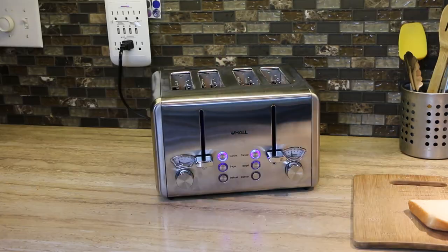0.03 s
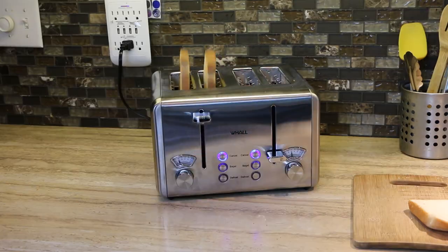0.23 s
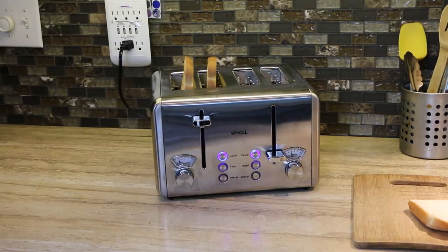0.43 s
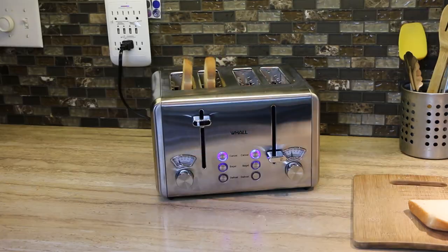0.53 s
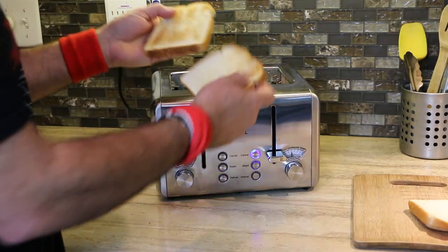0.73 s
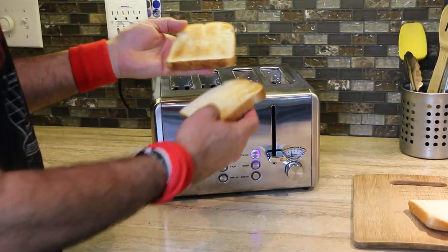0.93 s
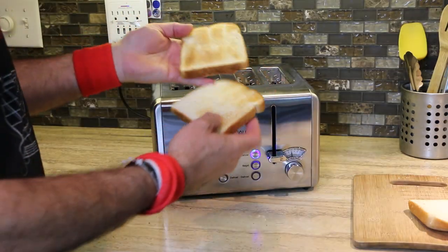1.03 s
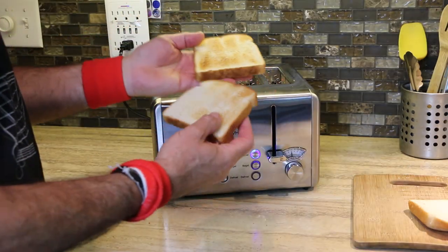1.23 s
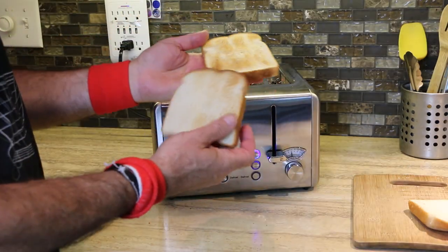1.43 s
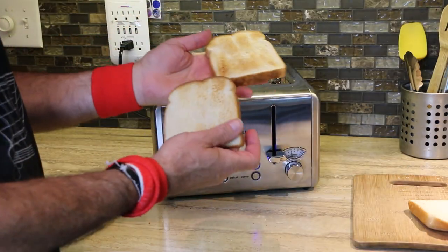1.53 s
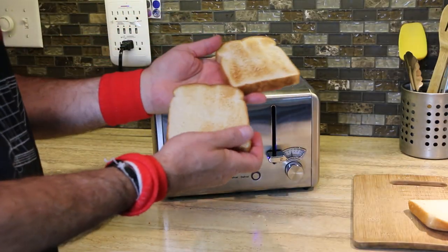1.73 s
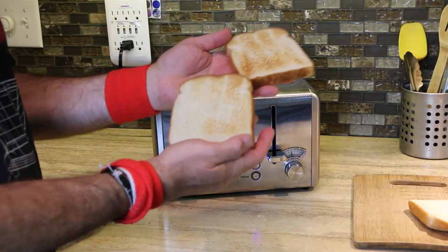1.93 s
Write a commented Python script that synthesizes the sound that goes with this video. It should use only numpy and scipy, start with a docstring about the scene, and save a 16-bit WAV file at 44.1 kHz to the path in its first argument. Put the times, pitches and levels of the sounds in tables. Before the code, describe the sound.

A toaster pops up at about 0.15 seconds with a sharp metal clack, a bright rattle and a soft thump on the counter. Lighter knocks and wire clinks follow until about 0.7 seconds as the toast and racks settle. The metal case and springs ring briefly, dying away with the kitchen's echo by around one second and leaving only faint, fan-like room noise.

```python
"""A sharp metal clack and rattle, then a few lighter knocks: a steel toaster pops up on a kitchen counter.
The latch lets go, the sprung carriage slams into its stop and rebounds, toast and wire racks settle.
The blows ring the sheet-metal case and springs; the recoil thumps the worktop.
A hard-walled kitchen reverberates over faint fan-like room noise."""
import sys
import numpy as np
from scipy import signal
from scipy.fft import rfft, irfft
from scipy.io import wavfile

SR = 44100
rng = np.random.default_rng(int(sys.argv[2]) if len(sys.argv) > 2 else 0)


def materialize(psi):
    """Save the field psi as 16-bit PCM at rate SR to the path in sys.argv[1].

    A 1-D psi becomes a single channel; in a 2-D psi each row is a channel.
    """
    bounded = np.clip(np.atleast_2d(psi).T, -1, 1)
    quanta = np.round(bounded * 32767).astype(np.int16)
    wavfile.write(sys.argv[1], SR, quanta)


N = 88200
T = np.arange(N) / SR
FREQS = np.maximum(np.arange(N + 1) * SR / (2 * N), 1)
ATTACK_S = 0.001

# latch, slam, rebounds, settling: t/s, clack level/dB, rattle level/dB, rattle cutoff/Hz, rise/s, t60/s
CARRIAGE_BLOWS = [(0.1319, -28.5, -39.5, 15000, 0.00081, 0.24), (.146, -13, -35, 11000, 0.0048, 0.076),
                  (0.1514, -12, -36, 12000, 0.0017, .06), (.159, -19.5, -32, 13000, 0.002, 0.067),
                  (0.175, -22.5, -25, 15200, 0.0021, 0.092), (0.183, -30.5, -24.5, 14800, 0.0038, 0.19),
                  (.200, -46, -31.5, 14600, 0.0064, 0.29), (0.244, -41, -45, 11000, 0.0015, 0.24),
                  (.300, -35, -60, 8000, 0.0026, 0.1), (.343, -35.5, -52, 8000, 0.0043, 0.26),
                  (0.364, -36.5, -35.5, 15000, 0.0046, 0.17), (0.382, -36.5, -34.5, 13800, 0.0036, 0.12),
                  (0.426, -38.5, -56, 7000, 0.0034, 0.15), (0.496, -41, -39, 9600, .003, 0.12),
                  (.575, -35, -36, 9400, 0.0041, .085), (.607, -41, -50, 8000, 0.0016, 0.03),
                  (0.659, -54, -69, 6980, 0.0046, 0.11)]


def carriage():
    """Each blow is a burst of contacts: frame clack plus brighter rattle, duller when soft toast lands."""
    # frame spectrum: f/Hz, level/dB
    clack_spectrum = [(59, -49), (100, -8), (403, -5), (742, -6.5), (1090, -8), (1370, -8), (2370, -8.5),
                      (2630, -12), (3390, -9), (4190, -13.5), (4750, -12.5), (5170, -22), (7560, -22),
                      (12600, -30), (15500, -38)]
    # rattle spectrum: f/Hz, level/dB
    rattle_spectrum = [(500, -14), (2000, -5.5), (4300, -0.5), (5500, -2), (7600, -2.5), (10000, -6),
                       (12300, -5), (15500, -8)]
    clack, rattle = 0, 0
    for start_s, clack_db, rattle_db, cutoff_hz, rise_s, t60_s in CARRIAGE_BLOWS:
        burst = fade(start_s, t60_s, rise_s)
        lowpass = signal.butter(2, cutoff_hz, fs=SR, output="sos")
        clack += undb(clack_db) * burst * chatter()
        rattle += undb(rattle_db) * signal.sosfilt(lowpass, burst * chatter())
    return colour(clack, clack_spectrum) + racks(colour(rattle, rattle_spectrum))


def racks(rattle):
    """The wire racks add narrow treble resonances."""
    # rack resonances: f/Hz, width/Hz, level/dB
    resonances = [(3400, 220, -21), (5050, 90, -9), (7450, 150, -13), (7950, 220, -11), (10960, 180, -3),
                  (12700, 200, -1)]
    peaks = sum(undb(db) / (1 + 2j * (FREQS - hz) / width_hz) for hz, width_hz, db in resonances)
    return shape(rattle, 1 + peaks)


def case(force_scatter=0.28):
    """The blows ring panels and springs, each mode with a slightly different force every time."""
    # case and spring modes: f/Hz, rms level/dB, t60/s
    modes = [(104.9, -55, 1.1), (209.8, -46, 0.98), (417, -52, .95), (615, -56, 1.27), (773, -52, 0.2),
             (860, -51.5, 0.34), (1130, -51.5, 0.22), (1145, -53, 0.26), (1260, -60, 0.47),
             (1748, -57.5, 0.51), (2000, -58.5, 1.1), (3330, -52, 0.11), (3335, -49, .42),
             (3435, -54, 0.11)]
    onsets = [int(blow[0] * SR) for blow in CARRIAGE_BLOWS]
    strength = undb([blow[1] for blow in CARRIAGE_BLOWS])
    force = strength[:, None] * (1 + force_scatter * rng.standard_normal((len(onsets), len(modes))))
    ringing = 0
    for k, (hz, db, t60_s) in enumerate(modes):
        impulses = np.zeros(N)
        impulses[onsets] = force[:, k]
        mode = signal.fftconvolve(impulses, ring(0, hz, t60_s, ATTACK_S))[:N]
        ringing += undb(db) * unit(mode)
    return ringing


def counter(rise_s=0.0087):
    """Recoil rocks the toaster on its feet and thumps the worktop."""
    # thumps: t/s, level/dB
    thumps = [(.139, -26), (.174, -30.5), (0.263, -32.5), (0.397, -35), (0.573, -39.5)]
    # modes of each thump: f/Hz, relative level/dB, t60/s
    modes = [(66.3, -12.5, 0.44), (94.2, 0.5, 0.2), (182.3, 1.5, 0.13), (221.5, 0, 0.19)]
    return sum(undb(thump_db + mode_db) * ring(start_s, hz, t60_s, rise_s)
               for start_s, thump_db in thumps for hz, mode_db, t60_s in modes)


def loose_wires(half_width_hz=160):
    """A loose rack wire buzzes briefly at its own resonance."""
    # wire clinks: t/s, f/Hz, level/dB, t60/s
    clinks = [(.175, 3320, -23.5, .025), (.257, 3380, -30, 0.032), (.286, 3350, -28, 0.023),
              (.42, 2540, -42, 0.095), (0.5576, 1970, -30, .04)]
    sound = 0
    for start_s, hz, db, t60_s in clinks:
        buzz = narrow_band(chatter(), hz, half_width_hz)
        sound += undb(db) * fade(start_s, t60_s, ATTACK_S) * buzz
    return sound


def kitchen(direct, gain_db=-5, build_s=0.0035):
    """Diffuse wall reflections build up and die away, treble first."""
    # reverb spectrum: f/Hz, level/dB
    spectrum = [(60, -4.5), (200, 2), (600, 0.5), (1500, 0.5), (4000, -0.5), (8000, 0.5), (15000, 2.5)]
    # reverb decay: f/Hz, t60/s
    decay = [(100, 1), (1000, 0.92), (4000, 0.98), (14000, 0.31)]
    noise, tail = rng.standard_normal(N), 0
    for hz in 2. ** np.arange(5, 15):
        octave = shape(noise, np.maximum(1 - abs(np.log2(FREQS / hz)), 0))
        tail += octave * fade(0, along(decay, hz), build_s)
    response = unit(colour(tail, spectrum)) / np.sqrt(N)
    return undb(gain_db) * signal.fftconvolve(direct, response)[:N]


def room_noise(air_db=-48):
    """Steady rush of air with a wavering low hum."""
    # air spectrum: f/Hz, level/dB
    air_spectrum = [(25, -14), (53, -9.5), (82, -10.5), (120, -6.5), (152, -11.5), (209, -9), (260, -10.5),
                    (340, -7), (445, -10), (826, -6.5), (1200, -10), (2000, -16), (4000, -24), (5400, -34),
                    (8000, -39), (15500, -48)]
    # hum bands: f/Hz, half-width/Hz, level/dB
    hum_bands = [(112, 10, -58), (420.6, 11, -64)]
    air = undb(air_db) * shaped_noise(air_spectrum)
    hum = sum(undb(db) * narrow_band(rng.standard_normal(N), hz, half_width_hz)
              for hz, half_width_hz, db in hum_bands)
    return air + hum


def chatter(contacts_per_s=8000, scatter_db=2.5):
    """Dense run of tiny metal contacts of uneven size, rms 1."""
    contacts = rng.random(N) < contacts_per_s / SR
    polarity = np.sign(rng.standard_normal(N))
    size = undb(scatter_db * rng.standard_normal(N))
    return unit(contacts * polarity * size)


def ring(start_s, hz, t60_s, rise_s):
    """One struck mode."""
    return fade(start_s, t60_s, rise_s) * np.sin(2 * np.pi * hz * (T - start_s))


def fade(start_s, t60_s, rise_s):
    """Envelope: quick rise, exponential decay."""
    age_s = np.maximum(T - start_s, 0)
    return (1 - np.exp(-age_s / rise_s)) * np.exp(-np.log(1000) * age_s / t60_s)


def shaped_noise(spectrum):
    """Noise with a (f/Hz, level/dB) spectrum, rms 1."""
    return unit(shape(rng.standard_normal(N), undb(along(spectrum, FREQS))))


def narrow_band(x, hz, half_width_hz):
    """One resonant band of x, rms 1."""
    return unit(shape(x, 1 / (1 + ((FREQS - hz) / half_width_hz) ** 2)))


def colour(x, spectrum):
    """Minimum-phase filter through (f/Hz, level/dB) points; keeps the power of white noise."""
    gain = unit(undb(along(spectrum, FREQS)))
    cepstrum = irfft(np.log(gain))
    cepstrum[1:N] *= 2
    cepstrum[N + 1:] = 0
    return shape(x, np.exp(rfft(cepstrum)))


def shape(x, gain):
    """Filter by one gain per frequency."""
    return irfft(rfft(x, 2 * N) * gain)[:N]


def along(points, hz):
    """Interpolate a table over log frequency."""
    points_hz, values = np.transpose(points)
    return np.interp(np.log(hz), np.log(points_hz), values)


def unit(x):
    """Scale to rms 1."""
    return x / np.sqrt(np.mean(x ** 2))


def undb(db):
    """Decibels to gain."""
    return 10 ** (np.asarray(db) / 20)


def scene():
    """Toaster and kitchen, the same in both channels."""
    blows, clinks = carriage(), loose_wires()
    direct = blows + clinks + case() + counter()
    reverb = kitchen(blows + undb(-5) * clinks)
    sound = direct + reverb + room_noise()
    return np.array([sound, sound])


def record(dry):
    """Faint independent electronic hiss per channel, then a steep low-pass."""
    # hiss spectrum: f/Hz, level/dB
    hiss_spectrum = [(40, 2), (300, 7.5), (1300, -20.5), (4000, 1), (15500, 3)]
    hiss_db, cutoff_hz = -62, 15700
    hiss = undb(hiss_db) * np.array([shaped_noise(hiss_spectrum) for _ in dry])
    lowpass = signal.ellip(10, .1, 80, cutoff_hz, fs=SR, output="sos")
    return signal.sosfilt(lowpass, dry + hiss)


dry = scene()
out = record(dry)
materialize(out)
```